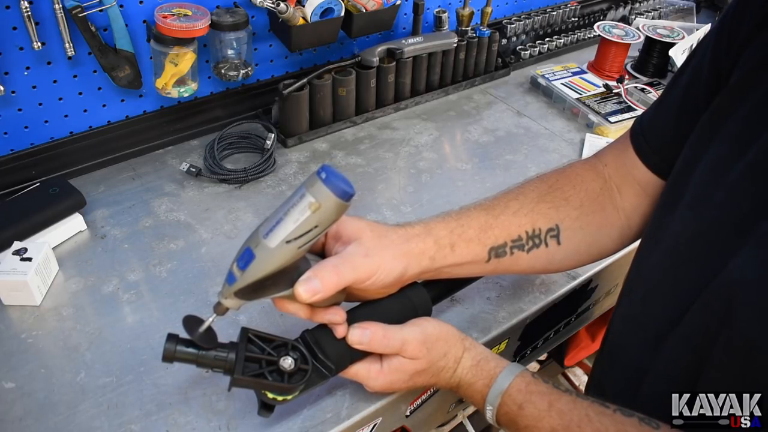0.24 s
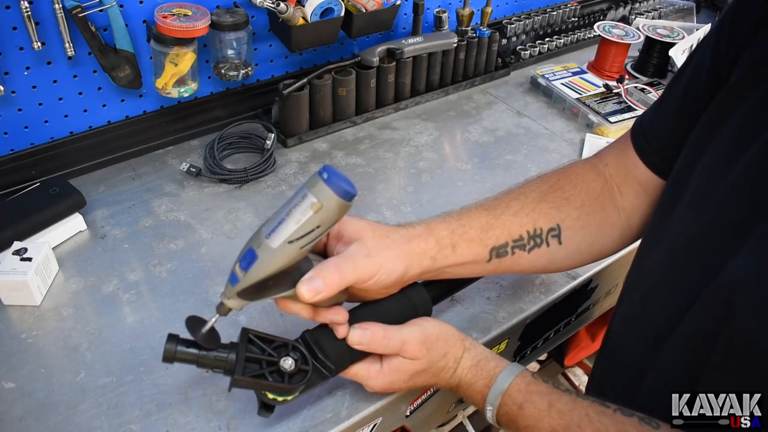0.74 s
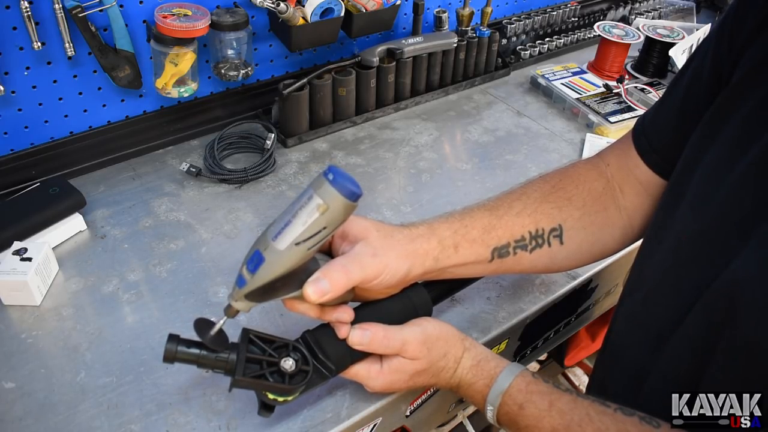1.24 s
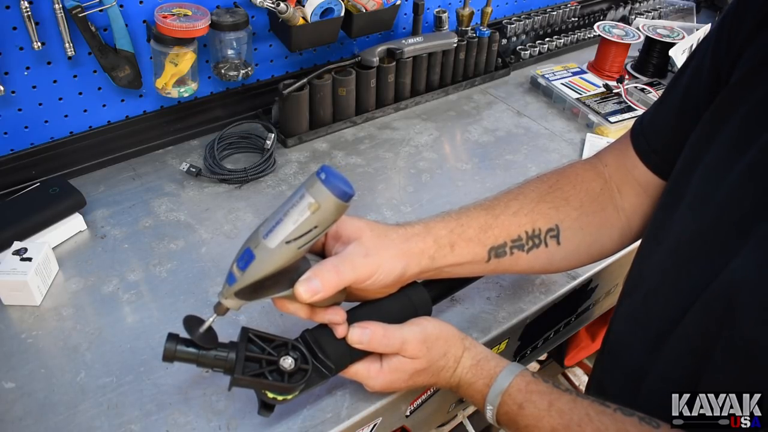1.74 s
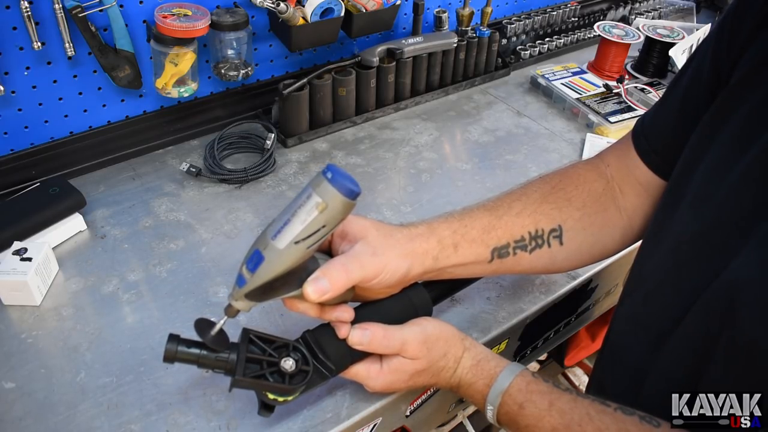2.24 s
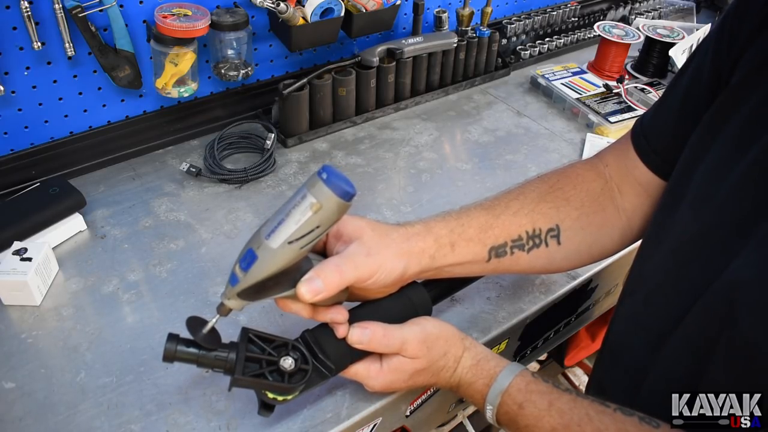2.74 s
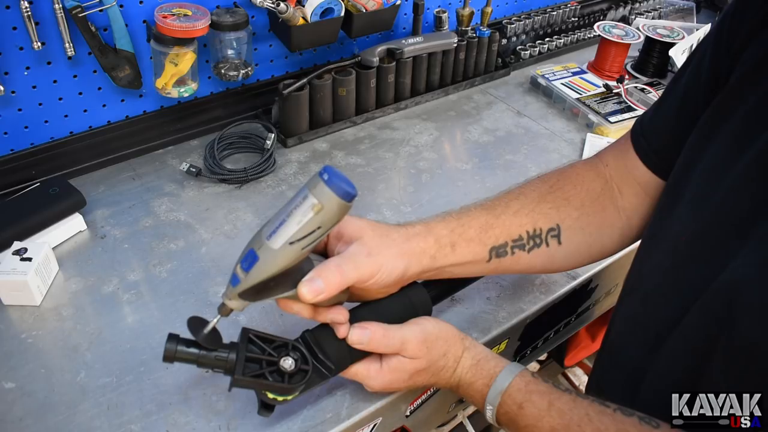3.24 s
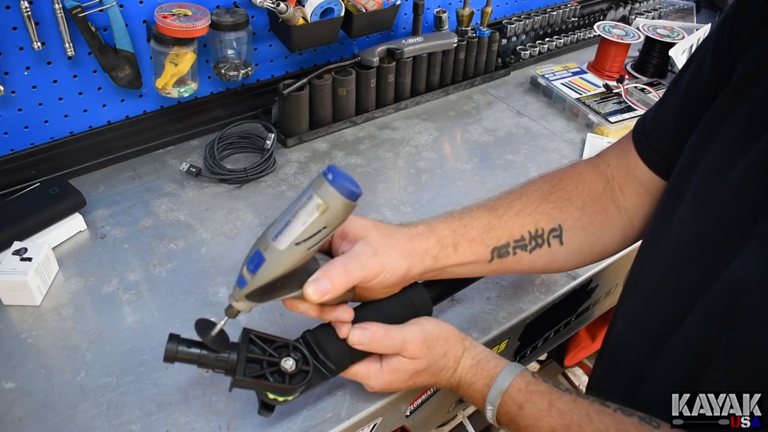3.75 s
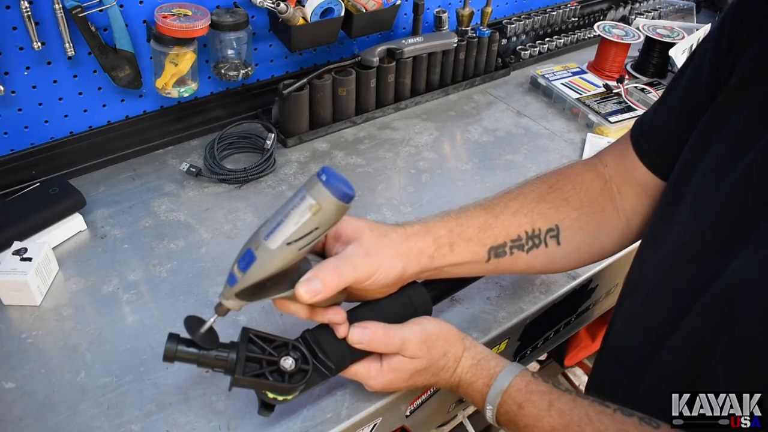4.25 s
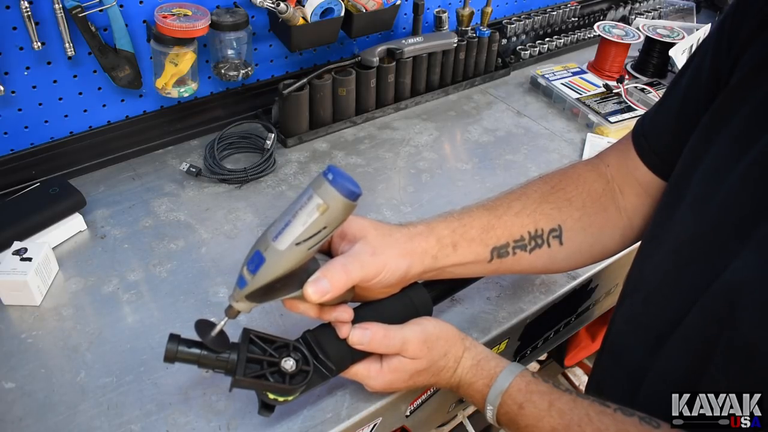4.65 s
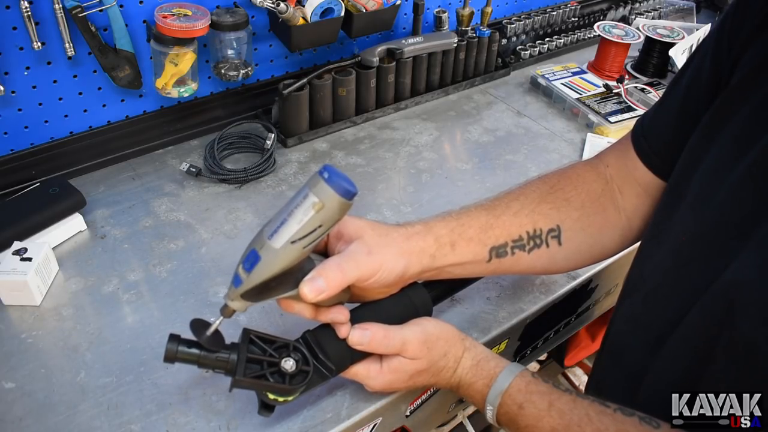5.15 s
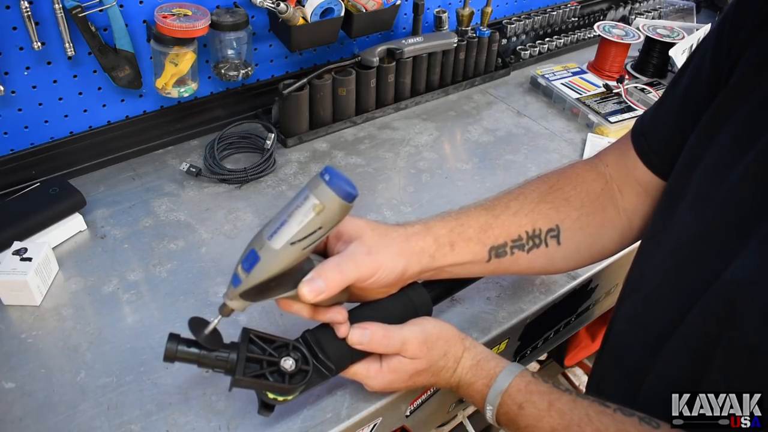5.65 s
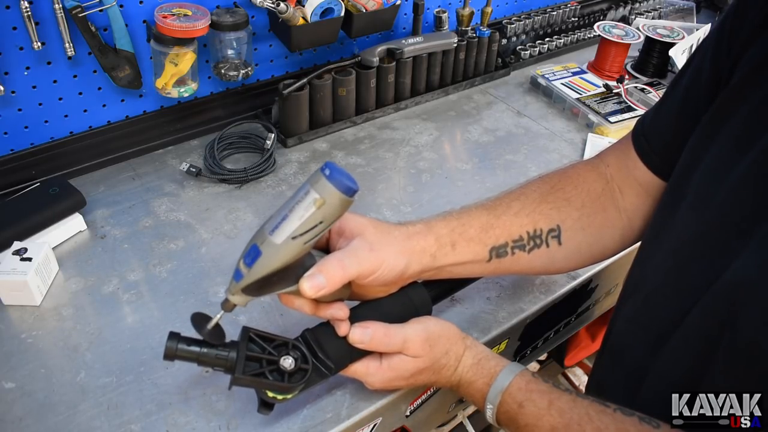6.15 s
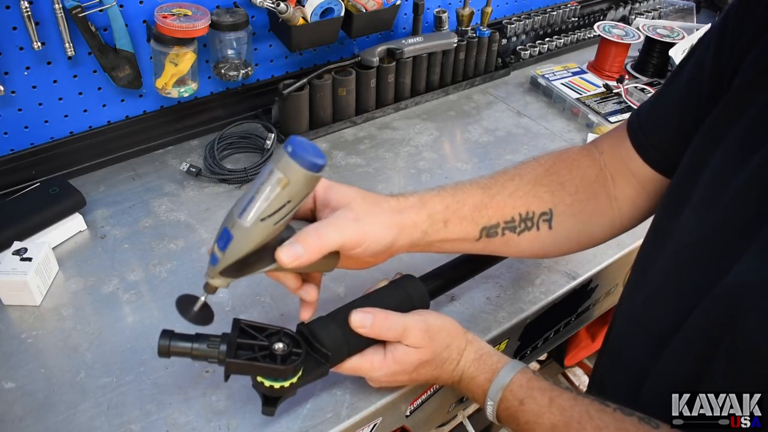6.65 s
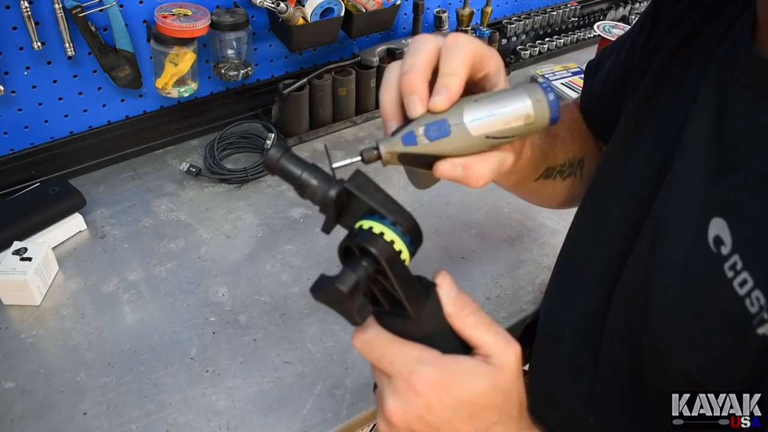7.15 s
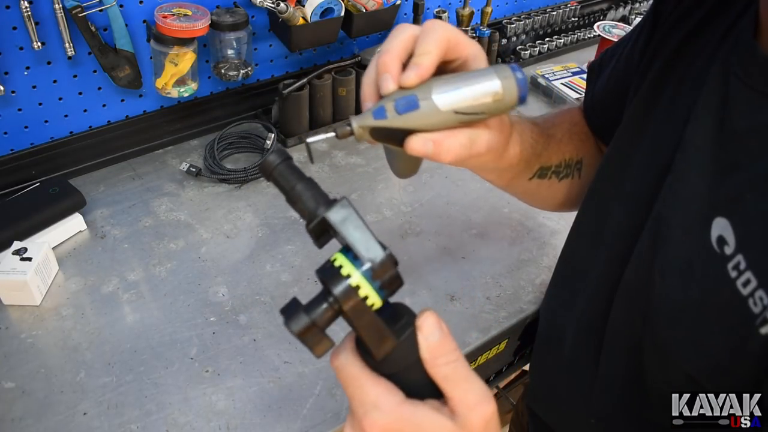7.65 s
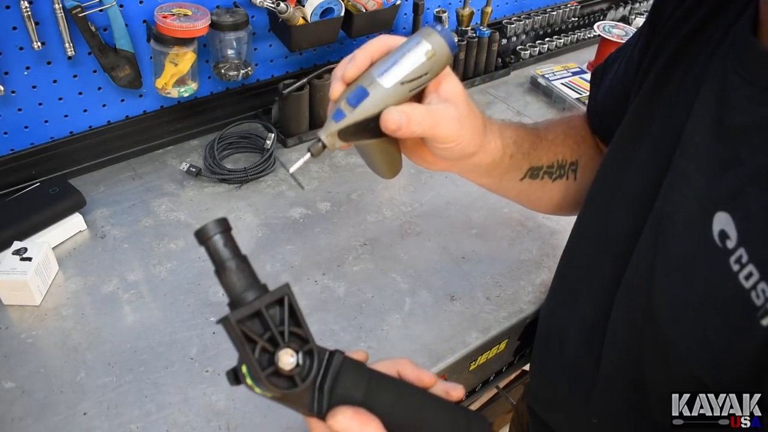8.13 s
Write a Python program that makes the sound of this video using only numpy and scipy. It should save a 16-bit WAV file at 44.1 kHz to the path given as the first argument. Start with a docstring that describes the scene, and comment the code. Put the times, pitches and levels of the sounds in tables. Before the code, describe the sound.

A small cordless rotary tool whines and grinds hard plastic at a workbench, pitch sagging under load, then freewheels, briefly bites again and runs free.

```python
"""At a workbench, a small cordless rotary tool with a cutting disc grinds a plastic part near a stereo microphone.
The shaft slows under load; the rim's bumps repeat each turn and wear away; flying chips patter on the microphone.
The disc lifts and runs free; after an abrupt cut to a second pose it bites again and runs free.
The tool is built turn by turn from multiples of the shaft speed; chips are filtered clicks, the air is
filtered noise, and sparse echoes make the shop."""
import sys
import numpy as np
from scipy import signal
from scipy.fft import rfft, irfft
from scipy.io import wavfile
from scipy.ndimage import uniform_filter1d, map_coordinates

SR = 44100
rng = np.random.default_rng(int(sys.argv[2]) if len(sys.argv) > 2 else 0)


def materialize(psi):
    """Save the field psi as 16-bit PCM at rate SR to the path in sys.argv[1].

    A 1-D psi becomes a single channel; in a 2-D psi each row is a channel.
    """
    bounded = np.clip(np.atleast_2d(psi).T, -1, 1)
    quanta = np.round(bounded * 32767).astype(np.int16)
    wavfile.write(sys.argv[1], SR, quanta)


N = 369999  # length in samples
TURN_S = 6.912  # the second pose begins, in seconds
FREE_HZ, LOADED_HZ = 421.5, 389  # shaft speeds with the rim clear of the part and fully in it


def gain_of(db):
    """Turns decibels into an amplitude factor."""
    return 10 ** (np.asarray(db) / 20)


def evened(x):
    """Scales a signal to an rms level of 1."""
    return x / np.sqrt(np.mean(abs(x) ** 2) + 1e-20)


def read_curve(points, hz):
    """Reads a curve of (Hz, value) points, with straight lines over log frequency."""
    f, value = np.transpose(points)
    return np.interp(np.log(hz + 1), np.log(f + 1), value)


def coloured(x, points):
    """Filters each channel by a spectrum and brings the result to rms 1."""
    spectrum_gain = gain_of(read_curve(points, np.fft.rfftfreq(N, 1 / SR)))
    return evened(irfft(rfft(x) * spectrum_gain, N))


def drifting(shape, turns):
    """Complex chance of power 1 that keeps its value for about this many steps of the first axis."""
    z = rng.standard_normal(shape) + 1j * rng.standard_normal(shape)
    keep = np.exp(-1 / max(turns, 0.1))
    once = signal.lfilter([1], [1, -keep], z, axis=0)
    return evened(signal.lfilter([1], [1, -keep], once, axis=0))


def paired(left, other, hz):
    """Two microphone ports share part of what they hear, depending on the frequency."""
    # How alike left and right are. Each row: frequency in Hz, likeness from 0 to 1.
    likeness = [(60, 0.56), (240, 0.84), (940, 1), (3730, 0.97), (14800, 0.69)]
    same = np.clip(read_curve(likeness, hz), -1, 1)
    return np.array([left, same * left + np.sqrt(1 - same ** 2) * other])


def tool():
    """Builds one waveform for each turn of the shaft and reads it out at the shaft angle."""
    orders_used, steps = 42, 1024  # multiples of the shaft speed, waveform points a turn
    t = np.arange(N) / SR
    turns, when, speed_hz = shaft(t)
    order = np.arange(1, orders_used + 1)
    hz = speed_hz * order
    second = when[:, None] >= TURN_S
    load = load_on(speed_hz)
    middle_free_db, middle_loaded_db = -22.5, -27  # the middle range between pushes
    rest_db = middle_free_db + (middle_loaded_db - middle_free_db) * load
    # How firmly the rim rests on the part between pushes, as the level of the disc's treble.
    # Each row: time in seconds, level in dB.
    contact = [(0, -17.5), (.25, -21.5), (.42, -44.5), (.72, -38.5), (.78, -29.5), (1.6, -33.5),
               (1.95, -33.5), (2.28, -46), (2.5, -29.5), (3.0, -25), (3.14, -38.5), (3.25, -32), (3.8, -32),
               (4.15, -29), (4.3, -34.5), (4.7, -31.5), (6.14, -29.5), (6.19, -53), (6.9, -60), (6.92, -41),
               (7.07, -49), (7.14, -40), (7.35, -24.5), (7.39, -50), (8.39, -50)]
    contact_db = np.interp(when, *np.transpose(contact))[:, None]
    bite_db, middle_db = pushed(when, contact_db, rest_db)
    chatter_db = 2.0 * load * drifting((len(when), 1), turns=3.0).real  # the whole rim bounces on the part

    grind = grinding(hz, second, load, bite_db, middle_db, chatter_db)
    whine = whining(hz, order, second, load, bite_db, middle_db, rest_db, chatter_db)
    angle = np.arange(steps) / steps * 2 * np.pi
    high_spot = evened(np.exp(0.14 * np.cos(angle)))  # the disc runs out of true and presses hardest once a turn
    table = waveform(grind, steps) * high_spot + waveform(whine, steps)
    # repeat the first point at the end, so that reading can cross the seam
    table = np.concatenate([table, table[..., :1]], axis=-1)
    place = [turns, turns % 1 * steps]
    return wobble(t, turns) + np.array([map_coordinates(side, place, order=1) for side in table])


def grinding(hz, second, load, bite_db, middle_db, chatter_db):
    """Bumps on the rim strike the part once a turn each, so part and disc ring at multiples of the shaft speed."""
    # How the part rings, one list for each pose. Each row: frequency in Hz, relative level in dB.
    part_rings = [
        [(350, -27), (600, -34), (1130, -6), (1290, 10), (1440, -23.5), (1620, -15), (2180, 1.5), (2940, -6),
         (4580, -10), (5200, -29), (6760, -62), (11400, -120)],
        [(350, -67), (600, -59), (1100, -13.5), (1270, -43), (1820, -1), (3220, -10.5), (3820, -0.5),
         (4420, -26), (5200, -24), (6760, -24), (11400, -120)],
    ]
    # How the thin disc rings. Each row: frequency in Hz, relative level in dB.
    disc_rings = [(2820, -23.5), (4800, -4.5), (5310, -13.5), (6110, 1), (6380, -6), (6860, -2.5),
                  (7380, -16), (7600, -0.5), (7970, -2), (9350, -8.5), (10200, -3), (11500, -9),
                  (12700, 3.5), (14400, -11), (15200, -96)]
    part = gain_of(np.where(second, read_curve(part_rings[1], hz), read_curve(part_rings[0], hz)))
    disc = gain_of(read_curve(disc_rings, hz))
    part_sound = gain_of(middle_db - 5.0) * np.sqrt(load) * unit(part)
    disc_sound = gain_of(bite_db) * unit(disc)
    # rougher when dragged down hard or held across
    grit = 0.47 + 0.012 * np.maximum(365 - hz[:, :1], 0) + 0.086 * second
    # the rim's bumps last some turns, the grit is nearly new each turn
    rims = [0.71 * drifting(hz.shape, turns=6.9) + grit * drifting(hz.shape, turns=0.64) for _ in range(2)]
    # the pressure on each ring flickers, alike for neighbouring orders
    flicker = uniform_filter1d(drifting(hz.shape, turns=2.3).real, size=7, axis=1)
    flicker_db = 2.36 * evened(flicker)
    dull_db = -3.0 * second * hz / 10000  # the disc faces away in the second pose
    return paired(*rims, hz) * (part_sound + disc_sound) * gain_of(flicker_db + chatter_db + dull_db)


def whining(hz, order, second, load, bite_db, middle_db, rest_db, chatter_db):
    """The motor's clean tones at multiples of the shaft speed, many of them shaped by the housing."""
    # The motor's tones. Each row: multiple of the shaft speed, relative level in dB.
    motor_tones = [(1, -2), (2, -22.5), (3, 3.5), (4, -2), (5, -3), (6, -16.5), (7, -23), (8, -9.5),
                   (9, -2), (10, -14.5), (11, -20), (12, -34), (13, -21.5), (14, -22)]
    motor_db = -1.5  # against the middle range
    clean = [0, 2, 3, 4, 5, 6, 8, 10, 11]  # orders 1, 3-7, 9, 11 and 12, counted from zero
    clean_order = order[clean]
    # above order 14 each tone is weaker than the one below
    motor = gain_of(np.interp(order, *np.transpose(motor_tones)) - 1.12 * np.maximum(order - 14, 0))
    # the clean whine stands out as the load comes off
    whine = gain_of(middle_db + motor_db) * np.sqrt(1 - 0.9 * load) * unit(motor)
    # turned away, the weak 2nd order swells under load and fades when free
    whine[:, 1:2] = gain_of(-51.0 + second * (5.5 - 13.5 * (1 - load)))
    push_db = 0.62 * load * (middle_db - rest_db - 3.5) * (clean_order > 3)  # brief pushes swell the upper tones
    push_db = push_db + 0.5 * (np.maximum(bite_db, -45) + 29) * (clean_order > 10)  # top ones follow the bite
    push_db = push_db - 7.7 * (clean_order == 11)  # the 11th order is kept quieter than the other clean tones
    # each clean tone's level wanders slowly at random, more under load
    wander_db = (0.5 + 2.9 * load) * drifting((len(hz), len(clean)), turns=19.3).real
    whine[:, clean] = housing(hz[:, clean], second) * gain_of(push_db + wander_db)
    # high orders waver slowly; the load makes every order but the first flutter, more so up to the 6th
    waver = (0.035 + 0.011 * order) * drifting(hz.shape, turns=19.0)
    flutter = 0.76 * load * np.minimum((order - 1) / 5, 1) * drifting(hz.shape, turns=4.1)
    start_phase = np.exp(2j * np.pi * rng.random(len(order)))
    return whine * start_phase * (1 + waver + flutter) * gain_of(0.71 * chatter_db)


def housing(hz, second):
    """Gain of the tool housing's resonances, which the clean shaft orders sweep through."""
    # Each row: frequency in Hz, width in Hz, level in dB, change in the second pose in dB.
    resonances = [(386.4, 28, -39.5, -12), (418, 50, -36.5, -3), (1265, 175, -29.5, -6.5),
                  (1504, 30, -53.5, 18.5), (1644, 167, -34, 0.5), (1825, 59, -36.5, 7.5),
                  (2028, 135, -34, 0.5), (2159.5, 51, -26.5, -2.5), (2324, 45, -32, 0),
                  (2488, 80.7, -45, 3.5), (2594, 78, -40, 0), (2930, 98, -50, -11), (3208, 163, -33, -8),
                  (3490, 200, -38, 2), (3730, 270, -35.5, -3), (4105, 106, -32.5, -3), (4500, 180, -40, -3),
                  (4960, 204, -43, 0.5)]
    power = 0
    for f, width, db, turned_db in resonances:
        power = power + gain_of(2 * (db + turned_db * second)) / (1 + (2 * (hz - f) / width) ** 2) ** 2
    return np.sqrt(power)


def wobble(t, turns):
    """A quiet tone at half the shaft speed that comes and goes."""
    # Each row: time in seconds, level in dB.
    wobble_level = [(.7, -87), (1.0, -60.5), (1.6, -65), (2.0, -58), (2.5, -60), (2.8, -85)]
    return gain_of(np.interp(t, *np.transpose(wobble_level))) * np.sqrt(2) * np.sin(np.pi * turns)


def shaft(t):
    """Counts the turns of the shaft; the grip of the rim makes the speed tremble under load."""
    # Shaft speed in the first pose. Each row: time in seconds, speed in Hz before the tremble.
    speed_first = [(0.0, 373.7), (0.25, 376.1), (0.46, 408.2), (0.77, 377.5), (1.35, 368.9), (1.9, 390.2),
                   (2.37, 379.3), (2.5, 365), (2.71, 377.2), (2.87, 368), (2.98, 377), (3.06, 367.4),
                   (3.29, 366.4), (3.33, 365.4), (3.75, 362.3), (4.18, 379.3), (4.25, 364), (4.66, 353.6),
                   (4.75, 358), (4.93, 383.8), (5.27, 375.7), (5.33, 388.3), (5.81, 366.6), (5.95, 355.6),
                   (6.02, 367.4), (6.14, 334.5), (6.22, 396.3), (6.33, 412.5), (6.52, 417.9), (6.91, 418.3)]
    # The same for the second pose. Each row: time in seconds, speed in Hz before the tremble.
    speed_second = [(6.915, 377.8), (7.057, 379), (7.131, 365), (7.184, 366.4), (7.342, 343), (7.373, 371),
                    (7.422, 398.7), (7.551, 416), (7.9, 418.2), (8.39, 418)]
    s, speed = np.transpose(list(speed_first) + list(speed_second))
    tremble = np.interp(t, np.arange(1000) / 100, drifting(1000, turns=1.434).real)  # 100 steps a second
    shaft_hz = np.interp(t, s, speed)
    turns = np.cumsum(shaft_hz + 0.02945 * np.maximum(FREE_HZ - shaft_hz, 0) * tremble) / SR
    when = np.interp(np.arange(3600), turns, t)  # the time of each turn, with turns to spare
    return turns, when, np.interp(when, s, speed)[:, None]


def load_on(speed_hz):
    """Load from 0 (free) to 1 (full): a slow shaft is loaded, less so while it gains speed."""
    spin_up_s = 0.05  # speed gained while the rotor catches up shows that the rim has let go
    gain_per_turn = uniform_filter1d(np.gradient(speed_hz, axis=0), size=9, axis=0)
    gaining = np.maximum(gain_per_turn * speed_hz, 0)  # Hz a second
    return np.clip((FREE_HZ - speed_hz - spin_up_s * gaining) / (FREE_HZ - LOADED_HZ), 0, 1)


def pushed(when, *rest_db):
    """Adds the power of each bell-shaped push to the resting treble and middle levels."""
    # Brief pushes of the disc into the part.
    # Each row: time in seconds, length in seconds, treble bite in dB, middle range in dB.
    pushes = [(0.028, 0.096, -16, -14), (0.173, 0.029, -19, -14.5), (0.23, 0.044, -19.5, -15.5),
              (0.312, 0.034, -24.5, -21), (0.523, 0.076, -56, -21), (1.241, 0.081, -32, -28.5),
              (1.428, 0.12, -21, -25), (1.628, 0.072, -19, -23.5), (1.746, 0.033, -27, -19),
              (1.89, 0.045, -28.5, -21.5), (2.008, 0.017, -25.5, -23.5), (2.36, 0.065, -49, -26),
              (2.609, .15, -22.5, -21.5), (2.811, 0.058, -21.5, -24), (2.935, .05, -23, -32),
              (3.007, 0.059, -26.5, -25.5), (3.122, 0.084, -47, -21.5), (3.339, 0.033, -35, -27),
              (3.404, .04, -54, -32), (3.639, .05, -33, -25.5), (3.91, 0.082, -22, -21),
              (4.02, .07, -21, -29), (4.319, 0.016, -42, -23.5), (4.439, .074, -54, -39),
              (4.737, 0.084, -26, -23), (4.856, 0.037, -19.5, -29), (4.987, .1, -25, -23.5),
              (5.291, 0.069, -24.5, -22), (5.5, 0.029, -37, -22), (5.61, 0.034, -24, -22.5),
              (5.731, 0.034, -30, -24.5), (5.901, 0.055, -25, -25.5), (5.96, 0.049, -27, -22.5),
              (6.065, 0.053, -23.5, -25), (6.117, 0.055, -27.5, -23), (7.135, 0.039, -41, -33),
              (7.2, 0.088, -23, -16), (7.303, 0.072, -26.5, -13.5)]
    s, length, *push_db = np.transpose(pushes)
    bell = np.exp(-((when[:, None] - s) / (0.64 * length)) ** 2)
    levels = []
    for rest, push in zip(rest_db, push_db):
        power = gain_of(2 * rest) + bell @ gain_of(2 * push)[:, None]
        levels.append(10 * np.log10(power))
    return levels


def unit(g):
    """Scales the orders of each turn to a total power of 1."""
    return g / np.linalg.norm(g, axis=-1, keepdims=True)


def waveform(orders, steps):
    """Adds up the orders of each turn into one cycle, with an empty place for order zero."""
    padded = np.pad(orders, [(0, 0)] * (orders.ndim - 1) + [(1, 0)])
    return irfft(padded, steps) * steps / np.sqrt(2)


def chips():
    """Showers of small clicks; a hit on one port pushes the other the opposite way."""
    # Showers of chips. Each row: middle in seconds, level in dB, length in seconds.
    showers = [(0.049, -17, 0.06), (0.088, -24.5, 0.073), (0.173, -18.5, 0.04), (0.231, -17.5, 0.048),
               (0.263, -24, 0.083), (1.424, -43, 0.1), (1.614, -29.5, 0.073), (2.804, -41, 0.072),
               (2.943, -28.5, 0.051), (3.905, -25, 0.024), (4.038, -47, 0.043), (4.76, -41, 0.038),
               (4.848, -36, .04), (5, -50, 0.053), (5.92, -48, 0.15), (6.131, -50, 0.035)]
    # Colour of the clicks. Each row: frequency in Hz, relative level in dB.
    click_colour = [(30, -23), (100, -8), (300, 2.5), (1000, 3.5), (3000, 1.5), (6000, -9), (15000, -33)]
    t = np.arange(N) / SR
    size = gain_of(0.79 * np.minimum(rng.exponential(1, (2, N)), 3)) * rng.choice([-1, 1], (2, N))
    struck = rng.random((2, N)) < 900 / SR  # about 900 hits a second on each port
    hits = size * struck * gain_of([[1.5], [-1.5]])  # a little stronger on the left
    clicks = coloured(hits - 0.11 * hits[::-1], click_colour)
    return clicks * sum(gain_of(db) * np.exp(-((t - s) / (length / 2)) ** 2) for s, db, length in showers)


def shop(x):
    """Sparse echoes of random sign that die away, other echoes for each port."""
    t60_s, shop_db = 0.86, -18.5  # time to fade by 60 dB, level against the direct sound
    t = np.arange(SR // 2) / SR
    present = (rng.random((2, len(t))) < 2000 / SR) * (t > 0.004)  # about 2000 a second, after 4 ms
    taps = rng.choice([-1., 1.], (2, len(t))) * present * gain_of(-60 * t / t60_s)
    # the bass stays near and central
    taps = signal.lfilter(*signal.butter(2, 1500, "high", fs=SR), taps)
    taps = gain_of(shop_db) * taps / np.linalg.norm(taps[0])
    return signal.fftconvolve(x, taps, axes=1)[:, :N]


def air():
    """Steady rush of the cooling fan and brushes, softer in the second pose; the bench rumbles in the first."""
    # Fan and brush noise. Each row: frequency in Hz, relative level in dB.
    rush_colour = [(30, -54), (55, -21), (400, -21.5), (700, -14), (1250, -8), (1750, 1), (2600, -7.5),
                   (3500, -7.5), (5000, -12.5), (9000, -23.5), (15200, -41)]
    # Shaking of the bench. Each row: frequency in Hz, relative level in dB.
    rumble_colour = [(25, -30), (50, -2.5), (100, -9), (250, -0.5), (600, -7), (1500, -71)]
    rush_db, rumble_db = -36, -62
    both, apart = rng.standard_normal((2, N))
    noise = np.array([both + 0.04 * apart, both - 0.086 * apart])  # nearly the same on both sides
    first = np.arange(N) / SR < TURN_S
    rush = coloured(noise, rush_colour) * gain_of(rush_db + 1.0 * first)
    return rush + coloured(noise, rumble_colour) * gain_of(rumble_db) * first


def scene():
    """Adds the tool, its echoes, the air and the chips."""
    near = tool()
    first = np.arange(N) / SR < TURN_S
    # the second pose starts afresh, with no echo of the first
    echoes = shop(near) * first + shop(near * ~first)
    return near + echoes + air() + chips()


def record(dry):
    """Limits the band: a steep filter removes what lies above the edge."""
    edge_hz = 15300
    low_pass = signal.firwin(511, edge_hz, window=("kaiser", 9), fs=SR)
    return signal.oaconvolve(dry, low_pass[None], "same")


dry = scene()
out = record(dry)
materialize(out)
```